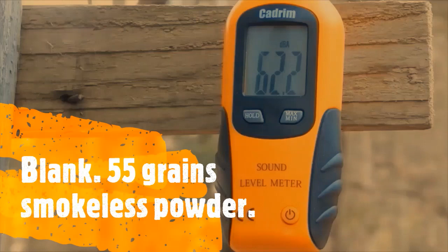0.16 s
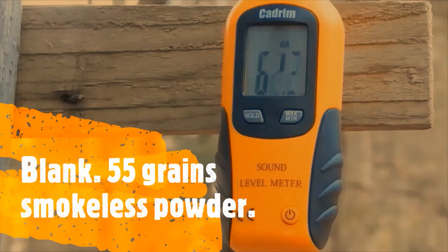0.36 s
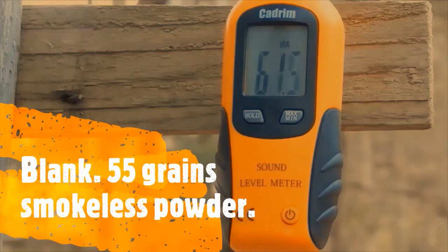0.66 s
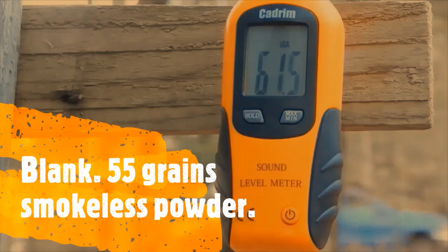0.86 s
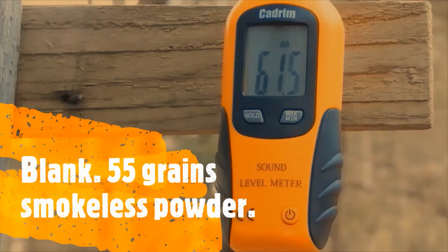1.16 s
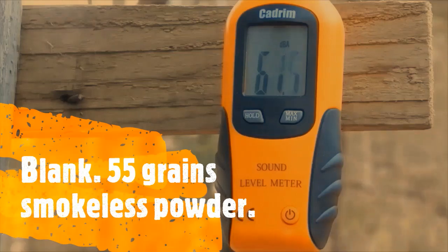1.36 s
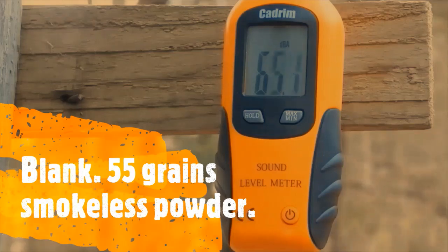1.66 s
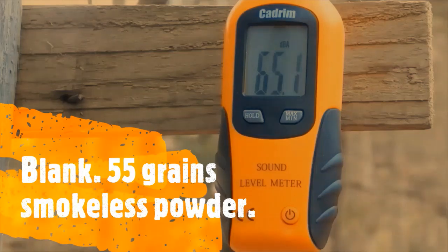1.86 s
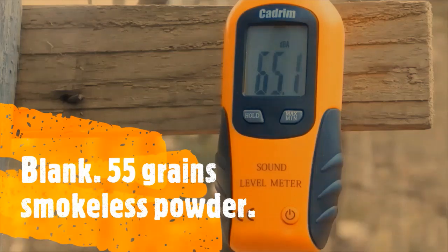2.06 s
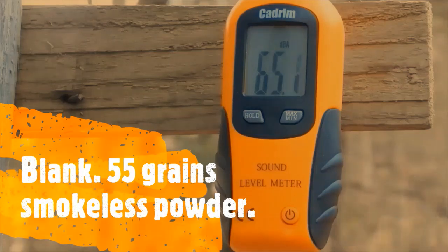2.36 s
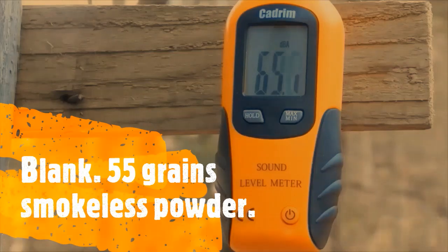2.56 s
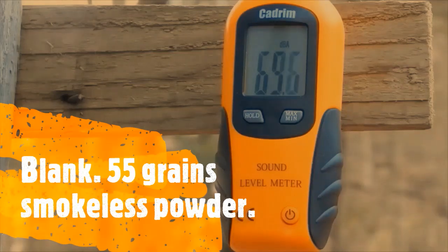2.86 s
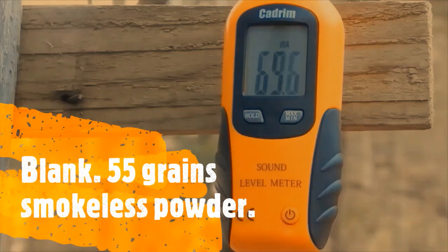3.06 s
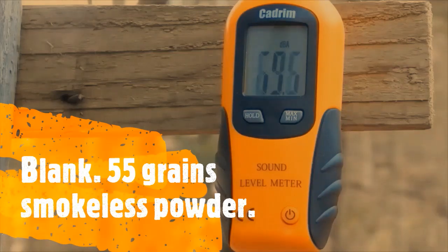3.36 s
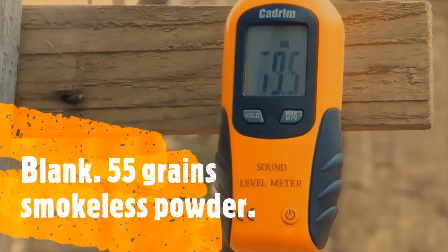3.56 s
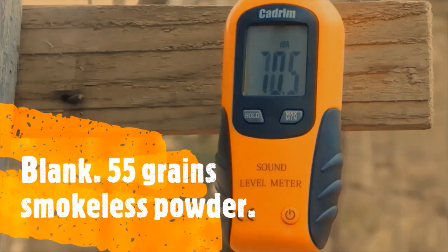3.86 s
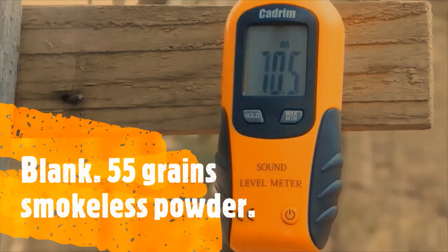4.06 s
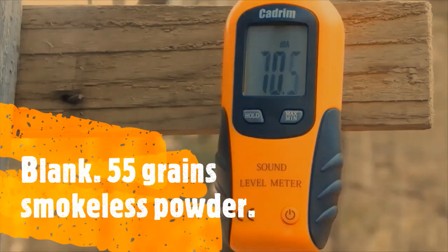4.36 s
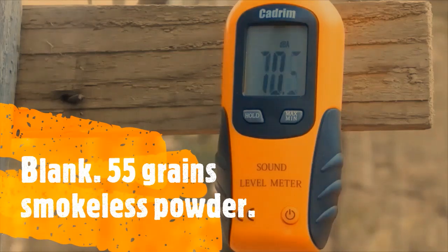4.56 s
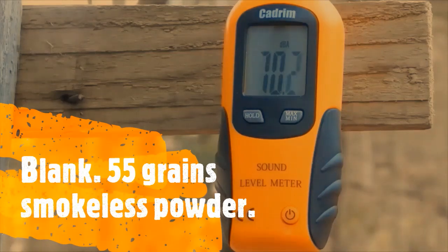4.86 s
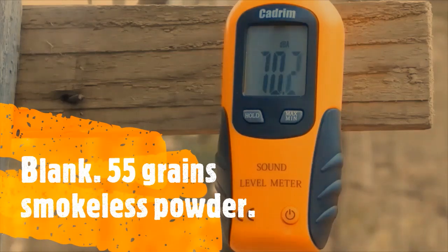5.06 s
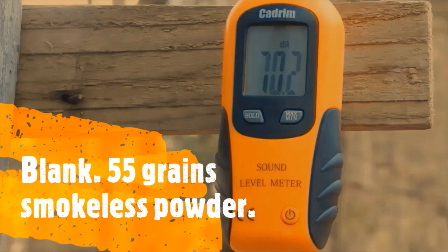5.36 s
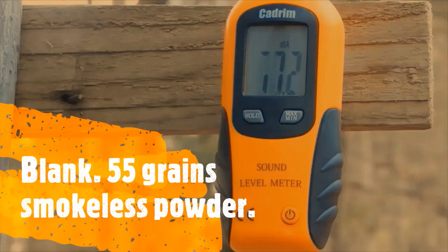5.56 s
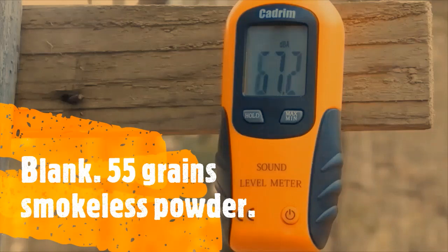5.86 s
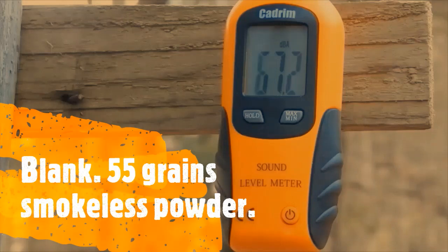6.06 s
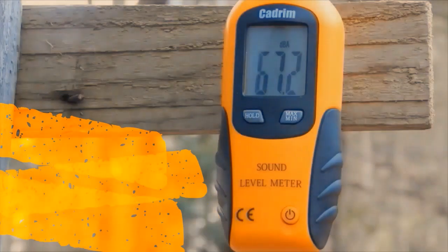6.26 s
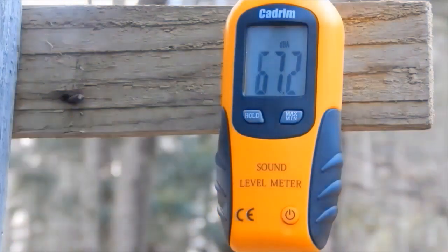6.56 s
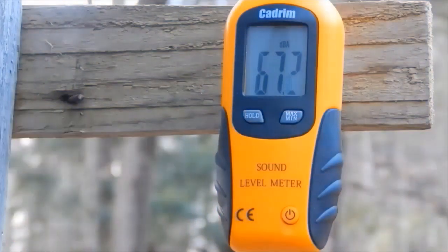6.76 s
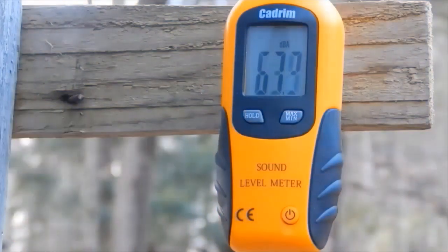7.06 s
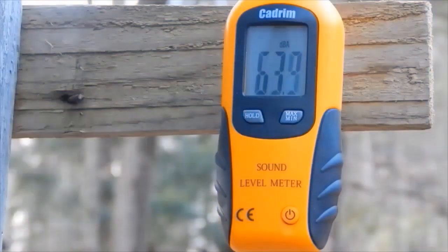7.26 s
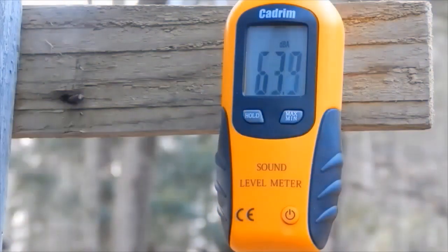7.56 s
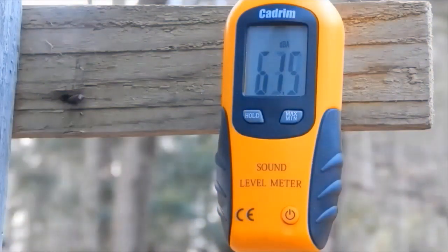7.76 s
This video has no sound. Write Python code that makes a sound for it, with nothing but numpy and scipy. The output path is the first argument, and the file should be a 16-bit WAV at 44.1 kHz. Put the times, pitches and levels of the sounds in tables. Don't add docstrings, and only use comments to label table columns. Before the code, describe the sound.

A heavy engine growls by from the first moment, building to a peak before three seconds and then gradually weakening. Steady low tones pulse and waver, sinking slightly in pitch as the truck passes. Broad tyre noise swells beneath, its brighter part flickering behind tree trunks. The sound is open, outdoor and low-heavy, heard on a small stereo microphone with barely noticeable self-noise; the truck is still audible at the end.

```python
import sys
import numpy as np
from scipy import signal
from scipy.fft import rfft, irfft, next_fast_len
from scipy.io import wavfile
from scipy.ndimage import uniform_filter1d, minimum_filter1d

SR = 44100
rng = np.random.default_rng(int(sys.argv[2]) if len(sys.argv) > 2 else 0)


def dump(signal):
    limited = np.clip(np.atleast_2d(signal).T, -1, 1)
    pcm = np.round(limited * 32767).astype(np.int16)
    wavfile.write(sys.argv[1], SR, pcm)


def linear_from_db(decibels):
    return 10 ** (np.asarray(decibels, float) / 20)


N = 348831


# (t/s, f/Hz)
CYCLE = [(0, 20.07), (.4, 20.05), (.7, 19.91), (1.1, 19.95), (1.5, 19.71), (2.2, 19.24), (2.7, 18.8),
         (3.2, 18.51), (3.9, 18.19), (4.5, 18.07), (5.1, 17.9), (6.2, 17.73), (7.91, 17.35)]


def engine_cycle():
    hz, = in_time(CYCLE)
    return turning(hz)


# (order, loudest level/dB rms, t/s of it, rise before/dB per s, fall after/dB per s)
PIPE_ORDERS = [(5, -12, 2.97, 3, 3), (6, -17, 4.66, 4.1, 2), (7, -16.5, 2.24, 11, 1.0),
               (8, -13, 2.98, 6, 6)]
# (t/s, order, level/dB, length/s)
PIPE_ECHOES = [(0.33, 5, 2.5, 0.12), (0.598, 8, -7, 0.23), (0.877, 6, 4, 0.18), (1.24, 5, -18, 0.075),
               (1.49, 5, -3.5, 0.7), (1.76, 5, -13.1, 0.062), (1.84, 6, 10, 0.23), (2.053, 8, 5, 0.22),
               (2.318, 5, 4, 0.1), (2.47, 8, -5.5, 0.05), (2.84, 7, -7.5, 0.3), (2.83, 8, -5, 0.3),
               (3.28, 5, -1, 0.2), (3.44, 6, -1.5, 0.37), (3.516, 7, -3.5, 0.1), (3.84, 7, 5, 0.091),
               (4.201, 6, 3.5, 0.1), (4.24, 7, 0, 0.45), (4.32, 5, 1.4, 0.3), (4.36, 8, 2.5, 0.14),
               (4.925, 5, -3, 0.038), (5.2, 7, 2.9, 0.14), (5.2, 8, -16.5, 0.05), (5.28, 6, -4.8, 0.14),
               (5.401, 5, 2.5, 0.1408), (5.76, 7, -7.5, 0.13), (5.88, 8, -8, 0.45), (6.32, 6, 1.3, 0.2),
               (6.88, 5, -8.5, 0.16), (7.36, 7, -2.5, 0.71)]


def exhaust(cycle):
    levels = order_levels(PIPE_ORDERS, PIPE_ECHOES)
    polarity = (1, 1, -1, -1)
    return sum(sign * tone(order * cycle, db, flutter_db=1.1, sway=0.35)
               for sign, (order, db) in zip(polarity, levels.items()))


# (order, loudest level/dB rms, t/s of it, rise before/dB per s, fall after/dB per s)
BLOCK_ORDERS = [(3, -24, 1.3, 7.9, 4), (9, -22.5, 4.16, 2.64, 5.3), (11, -28, 5.48, 1.86, 3.2),
                (13, -33, 5.1, 3.5, 3.5), (14, -34, 4.13, 8.3, 4.9), (15, -33, 5.1, 2.5, 3.6)]
# (t/s, order, level/dB, length/s)
BLOCK_ECHOES = [(0.1, 11, 6, 0.094), (0.28, 9, -9, 0.45), (0.72, 3, -13, 0.05), (1.0, 11, -6.5, 0.48),
                (1.0, 13, 2, 0.55), (1.88, 11, 8.5, 0.11), (1.96, 9, 6, 0.17), (2.32, 11, -11, 0.13),
                (2.36, 13, 11.5, 0.18), (2.5, 15, -14, 0.43), (2.68, 3, 5, 0.1), (2.96, 9, -4, 0.047),
                (3.12, 11, 6.5, 0.11), (3.32, 9, -1, 0.1), (3.48, 13, -24, 0.2), (3.84, 11, -8, 0.21),
                (3.92, 3, -5.5, 0.45), (4.08, 15, -10, 0.082), (4.12, 9, -8, 0.095), (4.35, 11, 4, 0.1),
                (4.88, 11, -4, 0.102), (5.12, 15, 6, 0.095), (5.32, 11, 5.5, 0.073), (5.68, 11, -5.5, 0.1),
                (6.04, 9, -11, 0.15), (6.76, 9, 6, 0.07), (7.55, 15, -10, 0.3), (7.64, 9, -21, 0.077),
                (7.8, 11, -24, 0.1)]
# (order, order it follows, level/dB against it)
FAINT_ORDERS = [(4, 9, -34), (10, 9, -7), (12, 13, -6), (16, 15, -7)]


def engine_block(cycle):
    block_db = order_levels(BLOCK_ORDERS, BLOCK_ECHOES)
    levels = list(block_db.items())
    levels += [(order, block_db[round(near)] + db) for order, near, db in FAINT_ORDERS]
    out = 0
    for order, db in levels:
        phase = rng.uniform(0, 2 * np.pi)
        out = out + tone(round(order) * cycle + phase, db, flutter_db=1.5, sway=0.19)
    return out


# (t/s, f/Hz, level/dB rms)
SHAFT = [(0, 120.3, -30.5), (1.4, 123.2, -26), (2.0, 121.5, -29), (2.6, 119.3, -19), (3.2, 119.4, -31),
         (3.8, 119.2, -41), (4.4, 118.8, -29.5), (5.0, 117.7, -36), (5.6, 119, -24), (6.4, 112.4, -39),
         (7.2, 124.2, -39.5), (7.91, 115.4, -32)]


def shaft():
    hz, db = in_time(SHAFT)
    turn = turning(hz) / 2
    hum = tone(2 * turn, db, flutter_db=0.4, sway=0.72)
    first = tone(turn, db - 21.5, flutter_db=1.7, sway=0.24)
    third = tone(3 * turn, db - 18.5, flutter_db=3.3, sway=0.1)
    return hum + first + third


# (t/s at centre, length/s, multiple of the engine cycle, width f/Hz, level/dB rms)
WHINE = [(1.4, .4, 43.5, 18, -35.5), (3.05, .25, 44.2, 14, -34), (4.8, .45, 45.2, 12, -33.5),
         (2.3, .3, 63.8, 22, -36), (2.3, .35, 32.8, 22, -36), (6.0, .5, 33.3, 22, -38),
         (7.5, .25, 35.5, 30, -40), (1.2, .25, 33.5, 30, -39), (1.2, .4, 22.5, 25, -39),
         (6.0, .4, 44.8, 25, -38), (3.8, .12, 46, 25, -37), (7.15, .2, 45, 18, -41),
         (3.85, .15, 67.5, 25, -40)]


def tread_whine(cycle):
    out = 0
    for s, length, multiple, width_hz, db in WHINE:
        narrow = drift(width_hz) * np.cos(multiple * cycle) + drift(width_hz) * np.sin(multiple * cycle)
        out = out + linear_from_db(db) * swell(s, length) * narrow
    return out


# (t/s, level/dB rms)
NEARNESS = [(0, -33), (1.2, -31.5), (2.4, -26), (3.5, -30), (4.45, -27), (5.4, -30.5), (6.5, -30.5),
            (7.91, -34)]


def tyres():
    near_db, = in_time(NEARNESS)
    return tyre_roar(near_db) + road_rumble(near_db)


# (f/Hz, level/dB)
ROAR = [(280, -8), (330, -9.5), (450, -3.5), (520, -13.5), (600, -5.5), (810, -8.5), (1020, -14),
        (1570, -18.5), (2200, -23), (3000, -28.5), (5000, -37), (7500, -42.5), (11300, -42.5), (13000, -63)]
# (t/s, treble level/dB, length/s)
TRUNKS = [(1.163, 3, 0.098), (2.415, 0.5, 0.12), (2.613, 1.5, 0.054), (2.717, -2, 0.031), (2.84, -1, 0.022),
          (3.036, 3, 0.031), (3.277, 0.5, 0.016), (3.482, -4, 0.11), (3.774, 3, 0.045), (3.89, -0.5, 0.03),
          (4.115, -0.5, .04), (4.46, 4.5, 0.15), (4.997, 0.5, .2), (5.558, 2.7, 0.3), (6.25, 1.5, .05),
          (6.69, 1.5, 0.16)]
# (loudest level/dB, t/s of it, rise/dB per s, fall/dB per s)
MIDDLE_VIEW = (-31.5, 2.5, 3, 1.5)
TREBLE_VIEW = (-38.5, 2.25, 4.1, 2.8)


def tyre_roar(near_db):
    trunk_db = sum(db * swell(s, length) for s, db, length in TRUNKS)
    roar_db = near_db + 0.31 * trunk_db
    middle_db = beam(*MIDDLE_VIEW) + 0.93 * trunk_db - roar_db
    treble_db = beam(*TREBLE_VIEW) + trunk_db - roar_db

    def shade_db(hz):
        high = np.clip(np.log2(hz / 800) / 0.76, 0, 1)
        higher = np.clip(np.log2(hz / 2000) / 0.83, 0, 1)
        top = np.clip(np.log2(hz / 8000), 0, 1) * (treble_db + 12.0)
        low = (hz < 560) * 0.25 * (near_db.mean() - near_db)
        return low + high * (1 - higher) * (middle_db + 8.5) + higher * (treble_db + 16.0) + top

    roar = linear_from_db(roar_db + 1.5) * banded_noise(ROAR, np.geomspace(280, 15500, 21), shade_db, patchy_db=1.32)
    dip_hz, dip_width_hz = 492, 113
    return 0.57 * roar + 0.41 * signal.lfilter(*signal.iirnotch(dip_hz, dip_hz / dip_width_hz, SR), roar)


# (f/Hz, level/dB per Hz)
RUMBLE = [(20, -19.5), (40, -7.5), (70, -9), (110, 6), (170, -2), (250, -7.5), (330, -13)]


def road_rumble(near_db):
    rumble = banded_noise(RUMBLE, np.geomspace(20, 300, 9), lambda hz: 0, patchy_db=0.7)
    return linear_from_db(near_db + 4.5) * rumble


# (f/Hz, left-right correlation)
LIKENESS = [(60, 0.93), (170, 1), (690, 0.852), (1200, 0.71), (1700, 0.31), (2300, 0.088), (3300, -0.25),
            (4800, -0.18), (7400, -0.071), (15000, 0.12)]


def banded_noise(spectrum, edges, shade_db, patchy_db):
    out, power, together = 0, 0, drift(5.7)
    white = rng.standard_normal((2, 2, N))
    for k, (low, high) in enumerate(zip(edges, edges[1:])):
        band_pass = signal.butter(2, [low, high], "band", fs=SR, output="sos")
        mid, side = signal.sosfilt(band_pass, white[k % 2])
        hz = np.sqrt(low * high)
        alike = np.clip(at_hz(LIKENESS, hz), -1, 1)
        stereo = np.sqrt(1 + alike) * mid + np.sqrt(1 - alike) * side * [[1], [-1]]
        band = linear_from_db(at_hz(spectrum, hz)) * stereo
        power += np.mean(band ** 2)
        flicker = 0.47 * together + drift(15.5) + 0.23 * drift(1.1)
        out = out + band * linear_from_db(shade_db(hz) + patchy_db * flicker)
    return out / np.sqrt(power)


def hiss():
    level_db, from_hz = -66.5, 7000
    thin = signal.butter(2, from_hz, "high", fs=SR, output="sos")
    return linear_from_db(level_db) * signal.sosfilt(thin, rng.standard_normal((2, N)))


def order_levels(orders, echoes):
    levels = {}
    for order, *shape in orders:
        echo_db = sum(db * swell(s, length) for s, j, db, length in echoes if round(j) == round(order))
        levels[round(order)] = beam(*shape) + echo_db
    return levels


def tone(angle, db, flutter_db, sway):
    return np.sqrt(2) * linear_from_db(db + flutter_db * drift(6.4)) * np.cos(angle + sway * drift(2.0))


def beam(top_db, s, rise_db, fall_db):
    t = np.arange(N) / SR - s
    return top_db + rise_db * np.minimum(t, 0) - fall_db * np.maximum(t, 0)


def swell(s, length):
    return np.exp(-.5 * ((np.arange(N) / SR - s) / length) ** 2)


def turning(hz):
    return 2 * np.pi * np.cumsum(hz) / SR


def drift(rate):
    r = np.exp(-80 * np.pi * rate / SR)
    slow = signal.lfilter([1], [1, -2 * r, r * r], rng.standard_normal(N // 40 + 2002))[2000:]
    slow = slow / np.sqrt(np.mean(slow ** 2) + 1e-20)
    return np.interp(np.arange(N) / 40, np.arange(len(slow)), slow)


def in_time(rows):
    s, *columns = np.transpose(rows)
    return [np.interp(np.arange(N) / SR, s, c) for c in columns]


def at_hz(points, hz):
    point_hz, value = np.transpose(points)
    return np.interp(np.log(np.maximum(hz, 1)), np.log(np.maximum(point_hz, 1)), value)


# (f/Hz, width f/Hz)
NOTCHES = [(2503, 114), (7490, 51)]


def housing(x):
    for hz, width_hz in NOTCHES:
        x = 0.21 * x + 0.8 * signal.lfilter(*signal.iirnotch(hz, hz / width_hz, SR), x)
    return x


# (f/Hz, left minus right level/dB)
LEAN = [(60, -.55), (180, -.5), (300, 0), (500, -1.1), (1000, -1.8), (2000, -2.2), (4000, -.8), (8000, -.4),
        (14000, -.2)]


def lean_right(x):
    size = next_fast_len(N + SR)
    hz = np.arange(size // 2 + 1) * SR / size
    gain = linear_from_db(at_hz(LEAN, hz) / 2 * [[1], [-1]])
    return irfft(rfft(np.pad(x, [(0, 0), (0, size - N)], "reflect")) * gain, size)[:, :N]


def limiter(x):
    ceiling_db, release_db_per_s = -0.7, 25.0
    over_db = np.maximum(20 * np.log10(np.abs(x).max(axis=0) + 1e-9) - ceiling_db, 0)
    over_db = -minimum_filter1d(-over_db, size=133)
    slope = release_db_per_s * np.arange(N) / SR
    held_db = np.maximum.accumulate(over_db + slope) - slope
    return x * linear_from_db(-uniform_filter1d(held_db, size=67))


def scene():
    cycle = engine_cycle()
    truck = exhaust(cycle) + engine_block(cycle) + shaft() + tread_whine(cycle)
    later = np.pad(truck, (7, 0), "edge")[:N]
    return np.array([truck, later]) + tyres() + hiss()


def low_pass(x):
    return signal.sosfilt(signal.butter(12, 14890, fs=SR, output="sos"), x)


def record(dry):
    mix = limiter(lean_right(housing(dry)))
    return low_pass(mix)


dry = scene()
out = record(dry)
dump(out)
```